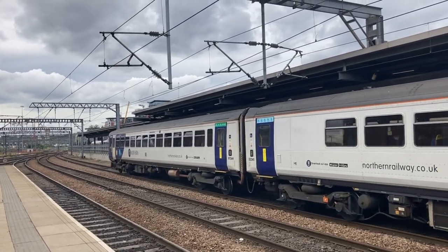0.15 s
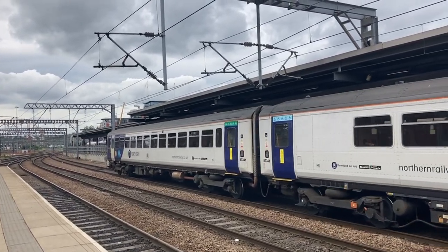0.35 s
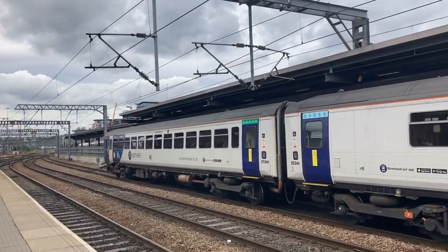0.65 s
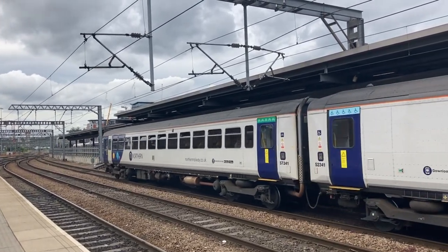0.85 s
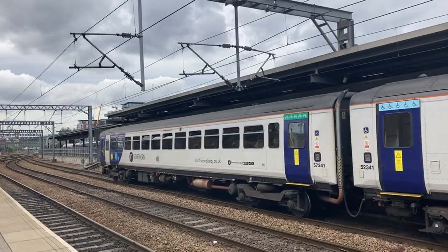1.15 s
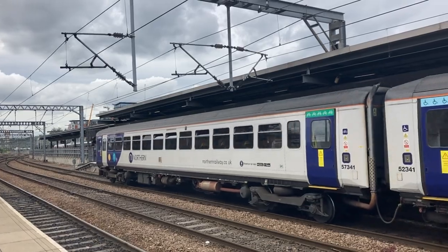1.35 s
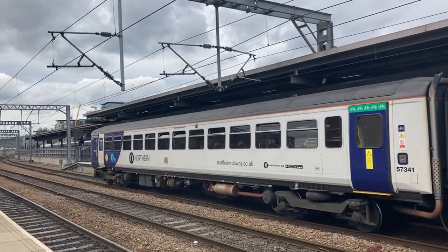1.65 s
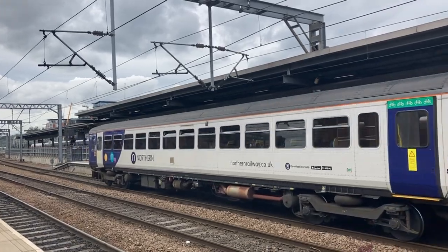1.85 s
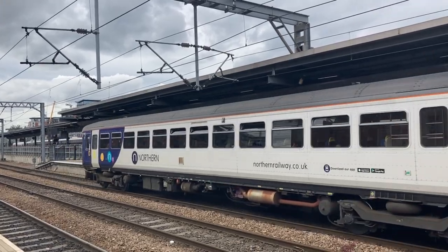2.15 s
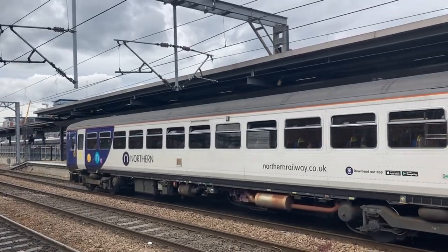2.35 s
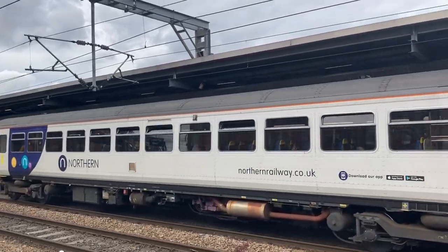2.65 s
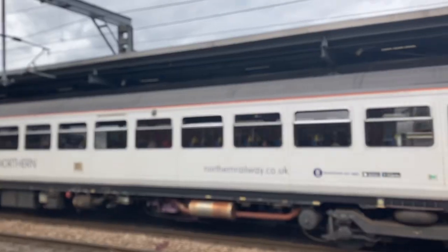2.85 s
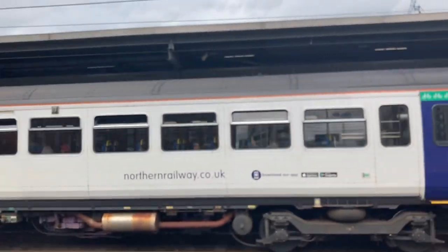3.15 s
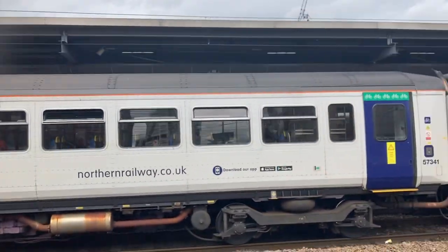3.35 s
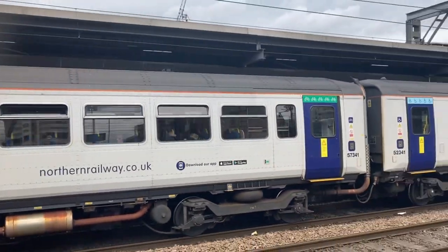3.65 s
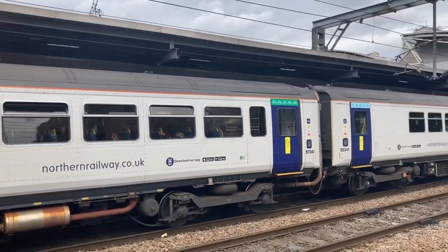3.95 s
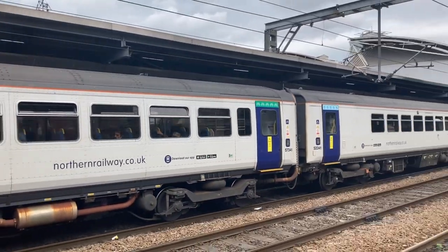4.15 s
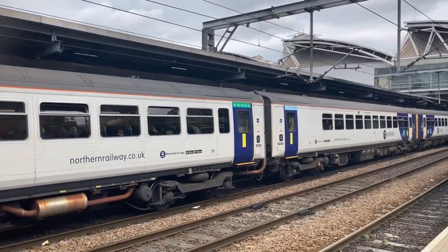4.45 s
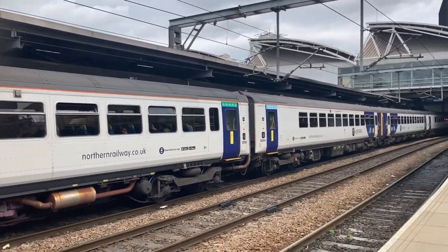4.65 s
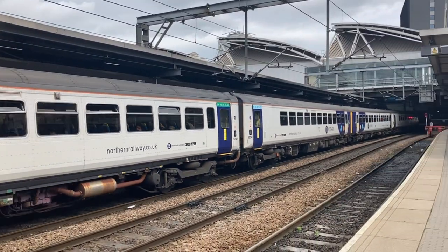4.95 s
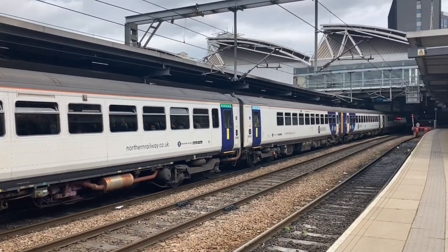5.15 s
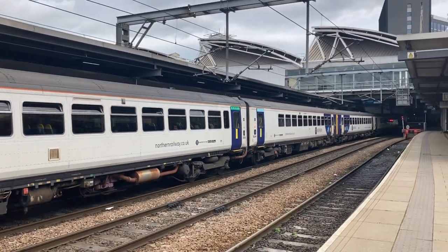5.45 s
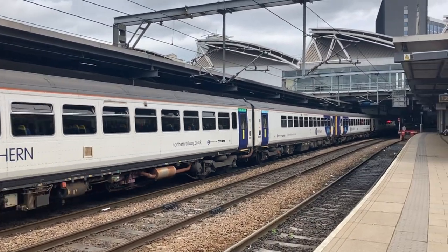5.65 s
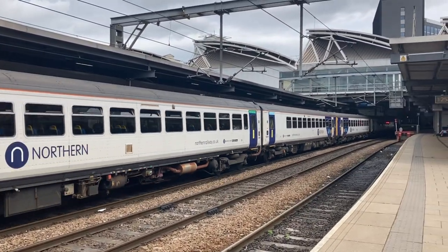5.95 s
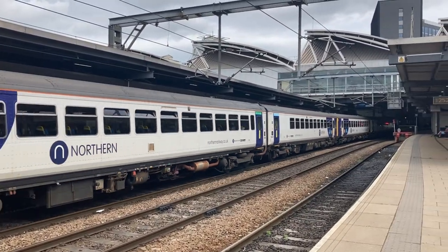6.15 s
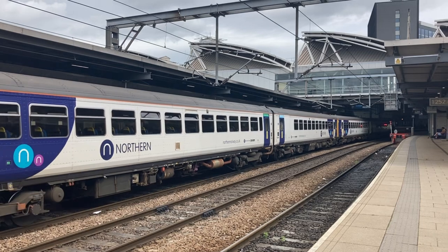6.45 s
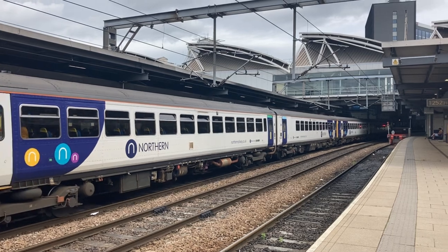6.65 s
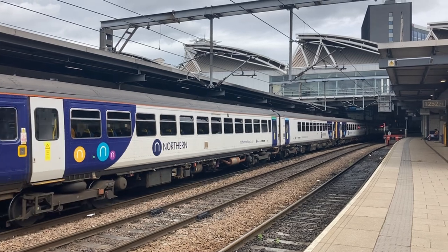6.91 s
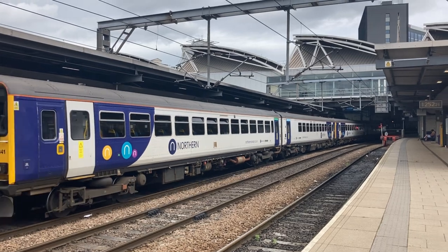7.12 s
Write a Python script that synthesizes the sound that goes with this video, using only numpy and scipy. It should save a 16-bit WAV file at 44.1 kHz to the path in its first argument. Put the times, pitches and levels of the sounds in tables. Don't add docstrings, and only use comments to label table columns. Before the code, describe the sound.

Close, windy phone pickup on a station platform: a low gust thump and an air-valve spit at once, then rolling wheel rumble with faint metal singing and diesel clatter. The valve chatters and releases a bright, hissing jet that dies away. Isolated spits return mid-way, strong fluttering gusts follow, and the last passing engine knocks harder towards the end, with slight canopy reflections.

```python
import sys
import numpy as np
from scipy import signal
from scipy.fft import rfft, irfft, next_fast_len
from scipy.io import wavfile
from scipy.ndimage import uniform_filter1d, minimum_filter1d, map_coordinates

SR = 44100
rng = np.random.default_rng(int(sys.argv[2]) if len(sys.argv) > 2 else 0)


def log_audio(samples):
    frames = np.atleast_2d(samples).T
    limited = np.clip(frames, -1, 1)
    pcm = np.round(limited * 32767).astype(np.int16)
    wavfile.write(sys.argv[1], SR, pcm)


def convert_level_to_amplitude(level_db):
    exponent = np.asarray(level_db, float) / 20
    return 10 ** exponent


N = 321048
TIME = np.arange(N) / SR
SIZE = next_fast_len(N + SR // 8)
HZ = np.fft.rfftfreq(SIZE, 1 / SR) + 1e-3

# [f/Hz, width/Hz, level/dB]
LAST_BLOCK = [(2420, 210, 6.5), (3010, 100, 4.5), (3900, 190, -4), (5500, 150, 0), (6000, 70, 7)]
HANDOVER_S = 3.73


def train():
    # [t/s, wheels/dB, engines/dB, rim ring/dB]
    passing = [(0, -33, -43.5, 0.5), (.35, -37, -48, 6.5), (.72, -35.5, -44, 5), (.77, -32, -43.5, 2),
               (1.3, -28.5, -40.5, 0.5), (1.8, -34.5, -42, 2), (2.3, -35, -42.5, -1.5),
               (2.6, -30, -42.5, -2.5), (2.85, -31, -43, -5), (3.1, -30.5, -39.5, -0.5),
               (3.93, -30, -39, 2.5), (4.2, -27.5, -40, 0.5), (4.6, -32.5, -43.5, 2),
               (5.09, -29.5, -40, -1), (5.6, -31.5, -41, 1), (6.02, -32.5, -40, -2),
               (6.6, -35.5, -43, -0.5), (7.28, -33.5, -42, -6)]
    # [t/s, lasts/s, level/dB]
    engine_dips = [
        (0.042, .1, -2),
        (0.633, .115, -6),
    ]
    roll_db, engine_db, rim_db = curves(passing)
    whole_db, bright_db = (db * np.exp(-((TIME - s) / lasts) ** 6) for s, lasts, db in engine_dips)
    pulses = firings()
    burning = np.convolve(pulses, np.exp(-np.arange(1200) / (.008 * SR)))[:N]
    wheels = convert_level_to_amplitude(roll_db + 2.5) * rolling(rim_db)
    gear_db = -40 + engine_db - engine_db.mean()
    engines = convert_level_to_amplitude(engine_db) * knock(burning, whole_db, bright_db) + convert_level_to_amplitude(gear_db) * gears()
    direct = wheels[0] + engines[0] + convert_level_to_amplitude(-40) * exhaust(pulses)
    direct += convert_level_to_amplitude(engine_db - 6.5 + .6 * bright_db) * engine_hiss(burning)
    return aimed(direct, convert_level_to_amplitude(-5) * wheels[1:] + convert_level_to_amplitude(.5) * engines[1:])


def rolling(rim_db):
    # [f/Hz, level/dB per Hz]
    roll_colour = [(18, -35), (30, 4.5), (85, 1.5), (176, 4), (357, 0), (426, -18.5), (617, -13.5),
                   (864, -0.5), (1120, -11), (1400, -7), (1820, -63), (3080, -120)]
    # [f/Hz, width/Hz, level/dB]
    rail_modes = [(732, 300, 5.5), (843, 105, -1), (1116, 104, 4.5)]
    # [t/s, level/dB]
    rail_ring = [(0, -2), (.5, 1.5), (1, -1.5), (1.5, -4), (2.1, 1), (2.7, -1), (3.25, 2), (4, 1.7),
                 (4.7, -2.5), (5.3, 0.5), (5.9, -1), (6.4, 5), (6.9, -1.5), (7.28, -4)]
    # [t/s, lasts/s, level/dB]
    shades = [
        (1.8, 0.34, 3),
        (2.4, .25, -2),
        (4.78, 0.31, -11),
        (7.0, .3, -5),
    ]
    rail_db = curves(rail_ring)[0]
    shade_db = sum(db * np.exp(-((TIME - s) / lasts) ** 2) for s, lasts, db in shades)

    def lift_db(lo):
        return rim_db * (lo > 900) + rail_db * (600 < lo < 900) + shade_db * (lo > 1100)

    gain = colour(roll_colour) * np.abs(1 + body(rail_modes))
    edges_hz = [0, 350, 500, 680, 950, 1190, 1750]
    return unit(restless(rng.standard_normal((3, N)), gain, edges_hz, 1.57, lift_db))


def firings():
    cylinder_db = [7.5, -20, 8, 1.5, -7, -0.5]
    firing_hz = 34.84
    count = int(N / SR * 34)
    late, strong = rng.standard_normal((2, count))
    at = ((np.arange(count) + 0.034 * late + .5) * SR / firing_hz).astype(int) % N
    pulses = np.zeros(N)
    pulses[at] = convert_level_to_amplitude(np.resize(cylinder_db, count) + 2.4 * strong)
    return pulses


def knock(burning, whole_db, bright_db):
    # [f/Hz, level/dB per Hz]
    knock_colour = [(1900, -13.5), (2250, -2), (3000, -2.5), (4300, -4.5), (5500, -14.5), (6400, -12.5),
                    (7000, -72)]
    # [f/Hz, width/Hz, level/dB]
    first_modes = [(2690, 350, 6), (3590, 89, -3), (2140, 60, -7)]
    handover_lasts_s = 1.4
    last = np.clip((TIME - HANDOVER_S) / handover_lasts_s + .5, 0, 1)
    burn = (burning + 2.45) * rng.standard_normal((3, N))
    first_block, last_block = shapes(burn, block_gain(first_modes), block_gain(LAST_BLOCK))
    blocks = (1 - last) * first_block + last * last_block

    def lift_db(lo):
        return whole_db + bright_db * (lo > 2800)

    edges_hz = 1800 * 2 ** np.arange(0, 2.1, 1 / 3)
    return unit(restless(blocks, colour(knock_colour), edges_hz, 1.55, lift_db))


def block_gain(modes):
    return 1 + sum(convert_level_to_amplitude(db) * np.abs(band(hz, width)) ** 2 for hz, width, db in modes)


def exhaust(pulses):
    # [f/Hz, width/Hz, level/dB]
    exhaust_modes = [(72.2, 8.3, 8.5), (106, 53, 0.5), (148, 69, -7)]
    return unit(shape(pulses, body(exhaust_modes) * band(107.4, 180)))


def gears():
    # [f/Hz, width/Hz, level/dB]
    gear_modes = [(1502, 80, 1), (1905, 500, -1)]
    sink_db = 3.5 * (2 * TIME / TIME[-1] - 1)
    lower, upper = shapes(rng.standard_normal((3, N)), body(gear_modes[:1]), body(gear_modes[1:]))
    return unit(convert_level_to_amplitude(1.23 * walk(7)) * (convert_level_to_amplitude(sink_db) * lower - convert_level_to_amplitude(-sink_db) * upper))


def engine_hiss(burning):
    # [f/Hz, level/dB per Hz]
    hiss_colour = [(5200, -26), (6300, 4.5), (8000, 3.5), (10000, 6.5), (12500, 3), (15500, -0.5),
                   (16500, -36)]
    return unit(shape((0.16 * burning + .5) * rng.standard_normal(N), colour(hiss_colour)))


def chirps():
    # [t/s, peak level/dB, strongest ring f/Hz]
    hard_knocks = [(4.6462, -39, 2430), (4.7186, -35, 2430), (4.9116, -34, 4100), (5.0887, -24, 3120),
                   (5.408, -36, 2420), (5.5402, -26, 2450), (5.8505, -31, 2330), (6.0216, -26, 2970),
                   (6.054, -29, 2470), (6.1019, -33, 2450), (6.1388, -30, 2460), (6.2256, -29, 3030),
                   (6.274, -37, 2460), (6.3159, -35, 2480), (6.3578, -29.5, 2530), (6.3883, -30, 3000),
                   (6.4865, -29, 2320), (6.527, -29, 2450), (6.6547, -29.5, 2490), (6.6966, -29, 2430),
                   (6.727, -31, 2470), (6.7589, -27.5, 3100), (6.7904, -29, 2420), (6.8687, -30, 2430),
                   (6.9295, -26, 3070), (7.0348, -29, 2970), (7.1181, -31.5, 2510), (7.161, -27.5, 2850),
                   (7.2039, -25.5, 3010), (7.2378, -29, 2420)]
    rise_s, width_hz, fan_hz = .004, 360, 5900
    out = convert_level_to_amplitude(-66) * np.clip((TIME - HANDOVER_S) / 2, 0, 1) * np.sin(2 * np.pi * fan_hz * TIME)
    noise = rng.standard_normal(N)
    block = convert_level_to_amplitude(-8) * unit(shape(noise, body(LAST_BLOCK)))
    t = np.arange(int(.05 * SR)) / SR
    for s, db, hz in hard_knocks:
        at = slice(int(s * SR), int(s * SR) + len(t))
        edges = [hz - width_hz / 2, hz + width_hz / 2]
        ring = unit(signal.sosfilt(signal.butter(1, edges, "band", fs=SR, output="sos"), noise[at]))
        push = (t / rise_s * np.exp(1 - t / rise_s))[:len(ring)]
        out[at] += convert_level_to_amplitude(db - 9) * push * (ring + block[at])
    return out


def singing():
    # [t/s, lasts/s, level/dB, f/Hz]
    sung = [(.03, .06, -47, 2130), (.34, 0.046, -33.5, 890), (.38, .05, -35, 1130), (.47, .06, -30.5, 1185),
            (.5, 0.13, -36, 890), (.66, .05, -40, 1200), (0.803, .05, -30, 950), (.85, .06, -32, 730),
            (.89, 0.042, -30.5, 860), (.88, .05, -37, 1313), (1.224, .08, -34, 1965),
            (1.321, .08, -36, 904), (1.82, 0.085, -36, 840), (1.93, 0.097, -48, 2950),
            (2.534, .07, -41, 1873), (2.62, 0.05, -38, 1507), (2.68, 0.06, -33, 860),
            (2.72, 0.063, -30.5, 715), (2.91, .08, -45, 2520), (3.01, 0.089, -40, 2000),
            (3.159, 0.055, -29, 2690), (3.319, 0.05, -41, 880), (3.423, .08, -36, 700),
            (3.776, .08, -37, 1290), (3.852, 0.1, -33, 690), (4.75, 0.092, -42, 1787),
            (5.282, .08, -35, 1100), (5.54, 0.085, -32, 845), (6.3, .08, -38, 1120),
            (6.376, 0.092, -39, 640), (6.725, 0.087, -40, 1076), (7.082, 0.07, -39.5, 710)]
    out, waver, flicker = np.zeros(N), walk(14), walk(40)
    for s, lasts, db, hz in sung:
        near = slice(max(int((s - .3) * SR), 0), int((s + .3) * SR))
        own = int(hz) * 50
        turns = np.cumsum(hz * (1 + .012 * np.roll(waver, own)[near])) / SR
        swell = np.exp(-((TIME[near] - s) / lasts) ** 2)
        level = convert_level_to_amplitude(db + 2.5 * np.roll(flicker, own)[near])
        out[near] += level * swell * np.sin(2 * np.pi * turns)
    return out


def valve():
    air = blow_off() + spits()
    return aimed(air[0], convert_level_to_amplitude(1) * air[1:])


def blow_off():
    # [t/s, jet level/dB, whistle level/dB]
    blow = [
        (1.17, -30, -36),
        (1.2, -24, -28),
        (1.28, -28.5, -30),
        (1.33, -25, -29.5),
        (1.63, -22.5, -29.5),
        (1.7, -30.5, -31),
        (1.89, -26, -32.5),
        (2.04, -35.5, -32),
        (2.2, -55, -50.5),
        (2.42, -47, -54),
    ]
    # [f/Hz, level/dB]
    jet_colour = [(1500, -15), (4000, -12), (6000, -10), (7500, -3.5), (10000, 7.5), (12500, 5.5),
                  (15500, 5), (16500, -31)]
    # [multiple of pipe pitch, width/Hz, level/dB]
    pipe_tones = [(2, 17, 0), (3.9, 120, -18), (4.95, 130, -12), (6.15, 170, -22), (6.72, 65, -6.5),
                  (7, 110, 2.5), (8, 68, -1.5), (9, 40, 0), (10, 170, -9), (11, 43, -1), (11.6, 90, -9),
                  (12, 50, -2), (13, 21, 5), (15, 12, 10)]
    # t/s, lasts/s, level/dB
    widest = (1.39, 0.26, -36)
    surge_s, surge_lasts_s, surge_db = widest
    pipe_hz, whistle_dies_s = 1015.1, 2.27
    noise = rng.standard_normal((3, N))
    pipe = colour(jet_colour) / (1 - .13 * np.exp(-2j * np.pi * HZ / pipe_hz))
    jet, surge = map(unit, shapes(noise, pipe, band(6920, 2500) * band(7000, 3000)))
    jet_db, whistle_db = curves(blow)
    on = np.interp(TIME, [1.17, 1.195, 2.3, 2.45], [0., 1., 1., 0.])
    spurts, waver = walk(69.73), walk(24.86)
    families = [[(k * pipe_hz, width, db) for k, width, db in pipe_tones[first::4]] for first in range(4)]
    tones = shapes(noise, *map(body, families))
    slow = uniform_filter1d(waver, size=2500)
    whistle = unit(sum(convert_level_to_amplitude(np.roll(slow, 9000 * k)) * tone for k, tone in enumerate(tones)))
    whistle = whistle / (1 + (TIME / whistle_dies_s) ** 40)
    air = convert_level_to_amplitude(jet_db + waver) * jet + convert_level_to_amplitude(whistle_db - 0.5 - 0.81 * waver) * whistle
    air = on * convert_level_to_amplitude(1.1 + spurts) * air
    wide_open = np.exp(-((TIME - surge_s) / surge_lasts_s) ** 2)
    return air + on * convert_level_to_amplitude(surge_db + spurts) * wide_open * surge


def spits():
    # [t/s, peak level/dB, crack level/dB, opening/ms]
    lone_spits = [(.08, -14, 13.5, 2.6), (.0934, -27, 16, 2.7), (.2777, -28, 0, 4), (0.552, -23, 15, 2.6),
                  (.829, -22, 3, 5), (0.9584, -18.5, 8, 6), (2.81, -20.5, -4, 6.9),
                  (3.719, -12.5, -2.5, 12.4), (3.926, -14, 0, 9.1), (3.972, -29, 11, 9.6),
                  (4.091, -16.5, 0, 10.5), (4.226, -19.5, 3, 2.8), (4.8882, -21.5, -10, 7.4)]
    # [t/s, peak level/dB]
    stutters = [(0.865, -19), (.972, -17), (.9914, -14.5), (1.0848, -15.5), (1.099, -17), (1.1143, -8.5),
                (1.129, -15.5), (1.153, -16.5), (1.1694, -27.5), (1.1906, -24)]
    # peak level/dB, t60/s, dull hiss level/dB, crack level/dB, opening/ms
    closing = (-30, 0.07, -2.5, 13, 3)
    bands = [band(12130, 3140) * band(12900, 4300), band(9750, 2300) * band(11740, 3100),
             band(8400, 3700) * band(7500, 5000)]
    shrill, wide, dull = map(unit, shapes(rng.standard_normal((3, N)), *bands))
    chatter = convert_level_to_amplitude(2.2 * walk(500))
    t = np.arange(int(.4 * SR)) / SR
    # t/s, peak/dB, t60/s, dull hiss/dB, crack/dB, opening/ms
    events = [(s, db, .39, -23, crack_db, open_ms) for s, db, crack_db, open_ms in lone_spits]
    events += [(s, db, .3, -16, 1, 3.9) for s, db in stutters]
    events += [(2.2385, *closing)]
    air = np.zeros((3, N))
    for s, db, t60, dull_db, crack_db, open_ms in events:
        at = slice(int(s * SR), int(s * SR) + len(t))
        opening = t / (open_ms / 1000)
        crack = chatter[at] * np.exp(-(2 * opening - 1) ** 4)
        escape = (0.68 * convert_level_to_amplitude(-60 * t / 0.065) + 0.47 * convert_level_to_amplitude(-60 * t / t60)) * np.minimum(opening, 1)
        lower = 0.59 * wide[:, at] + convert_level_to_amplitude(dull_db + 7) * dull[:, at]
        hiss = 0.62 * shrill[:, at] + np.minimum(0.7 * opening, 1) * lower
        air[:, at] += convert_level_to_amplitude(db - 12) * (convert_level_to_amplitude(crack_db) * crack + escape) * hiss
    return air


def wind():
    low, quick = gusts()
    lumps = convert_level_to_amplitude(2.5 * np.array([walk(45), walk(45), walk(45)])) * rng.standard_normal((3, N))
    deep, light, brisk = shapes(lumps, band(73, 113) * band(42, 90), band(252, 158) * band(374, 730),
                                band(322, 230) * band(380, 500))
    facing = np.exp(-((TIME - 4.85) / .98) ** 4)
    light = (1 - facing) * unit(light) + facing * unit(brisk)
    buffet, flutter = np.sqrt(low) * unit(deep), np.sqrt(quick) * unit(light)
    out = buffet[0] + convert_level_to_amplitude(-2) * buffet[1:] + flutter[0] + convert_level_to_amplitude(-3.5) * flutter[1:]
    return out + eddies()


def gusts():
    # [t/s, level/dB]
    breeze_levels = [(0, -32.5), (.55, -30.5), (.87, -31), (1.0, -27), (1.4, -32), (1.9, -32.5), (2.4, -32),
                     (2.8, -33), (3.4, -34), (4.4, -32.5), (4.7, -34), (5.35, -34), (5.87, -35.5),
                     (6.05, -34.5), (6.28, -47), (6.55, -32), (6.9, -33.5), (7.28, -31)]
    # [t/s, hold/s, buffet level/dB, flutter above buffet/dB]
    gust_table = [(0.0, 0.037, -19, -8), (0.99, .015, -32.5, 4.5), (1.04, 0.06, -24, -15),
                  (1.18, 0.051, -19.5, -13), (1.252, 0.15, -23.5, -8.5), (1.458, 0.22, -27.5, -9.5),
                  (2.096, 0.052, -31.5, 4), (2.161, 0.18, -25.5, -4.5), (2.514, 0.02, -27, -8),
                  (2.63, 0.037, -22.5, -6), (2.72, 0.088, -25, -12), (3.04, 0.15, -21.5, -13),
                  (3.595, 0.16, -28, -10), (4.007, 0.1, -29.5, 2), (4.18, 0.1, -25.5, 7),
                  (4.275, 0.057, -33.5, 6.5), (5.054, 0.11, -37.5, 11), (5.213, .04, -31, 2),
                  (5.37, .015, -27.5, -0.5), (5.462, 0.016, -26, -3), (5.543, 0.034, -28, 3),
                  (5.643, 0.087, -24.5, 2.5), (5.92, 0.033, -34, 2.5), (6.115, 0.017, -19.5, -10),
                  (6.16, 0.043, -29, 4.5), (6.373, 0.013, -34, 9), (6.536, 0.022, -36, -7),
                  (6.72, 0.074, -35.5, 0.5), (6.982, 0.07, -33, 0), (7.118, .05, -26.5, -12)]
    rise_s, fall_s = .0088, .021
    low = convert_level_to_amplitude(curves(breeze_levels)[0]) ** 2
    quick = low * convert_level_to_amplitude(-1) ** 2
    for s, hold, db, flutter_db in gust_table:
        near = slice(max(int((s - .05) * SR), 0), int((s + hold + .3) * SR))
        t = TIME[near] - s
        swell = np.clip(t / rise_s + 1, 0, 1) * np.exp(-np.clip(t - hold, 0, 1) / fall_s)
        gust = (convert_level_to_amplitude(db) * swell) ** 2
        low[near] += gust
        quick[near] += gust * convert_level_to_amplitude(flutter_db) ** 2
    return low, quick


def eddies():
    # [t/s, peak level/dB, f/Hz,
    # length/cycles]
    eddy_table = [(0.052, -5, 92, 1.7), (1.101, -9, 104, 2.3), (1.363, -7, 155.5, 1.6),
                  (1.6105, -6.5, 132, 0.56), (1.689, -9.5, 106, 0.49), (2.249, -4.5, 111, 0.79),
                  (2.285, -9, 95, 0.65), (2.565, -12.5, 66, 1.9), (2.628, -10, 141, 1.1),
                  (2.6688, -7.5, 113, 0.73), (2.953, -4.5, 94.5, 0.55), (3.067, -7, 114.4, 1.3),
                  (3.1204, -1, 91, 0.2), (3.1843, -9, 137, 0.75), (3.727, -18.5, 97, 0.82),
                  (4.095, -10, 146, 1.1), (4.221, -10, 93, 1.5), (4.266, -10.5, 153, 2.3),
                  (5.0198, -9, 128, 0.52), (5.9292, -8, 109, 0.5), (6.0867, -13, 100, 0.79),
                  (6.5856, -18, 67.3, 2.4), (6.976, -13, 83, 1.3), (7.147, -13.5, 145, 2.1),
                  (1.2013, -13.5, 290, 1.4), (1.367, -10.5, 293, 3.6), (2.1, -10.5, 314, 1),
             (2.1565, -13, 297, 4.1), (2.2598, -17, 320, 1.18), (2.666, -13, 477, 0.52),
             (3.0455, -14, 248, 3.6), (3.178, -11, 290, 2.5), (4.0268, -3, 465, 0.69),
             (4.085, -10, 431, 0.97), (4.1841, -6, 384, 0.77), (4.2006, -4, 421, 1.4),
             (4.217, -1, 432, 1.4), (4.2361, -5, 500, 1.7), (4.2515, -21.5, 402, 2.1),
             (4.2729, -5, 452, 0.46), (4.2976, -5, 547, 1.96), (4.3271, -10.5, 407, 2.3),
             (5.132, -7, 309, 0.6), (5.172, -6, 364, 0.62), (5.3732, -5.5, 324, 0.48),
             (5.4616, -12, 620, 1.8), (5.6304, -6.5, 477, .87), (5.701, -5, 496, 0.82),
             (5.7221, -10, 494, 1.1), (5.8005, -5.5, 460, 0.57), (5.9228, -11, 415, 2.6),
             (6.1258, -9.5, 246, 2.57), (6.172, -2, 424, 0.8), (7.14, -8.5, 296, 1.9),
                  (0.3227, -16, 855, 2.5), (.46, -25, 50, 1.5), (.53, -18, 300, 2.7), (0.821, -15, 200, 1.2),
              (1.0, -14, 280, 2.8), (1.06, -15.5, 130, 1.9), (1.14, -13, 320, 3), (1.29, -11, 48, 1.5),
              (1.3, -10, 216, 2.1), (1.42, -22, 48, 1.5), (2.701, -14, 340, 3.3), (2.762, -13, 120, 0.89),
              (2.79, -17, 236, 2.5), (2.87, -18.5, 50, 1.5), (3.113, -12, 280, 2),
              (3.2925, -13.5, 846, 2.5), (3.98, -18, 343, 3), (4.141, -14, 86, 1.8), (4.32, -16, 150, 2),
              (5.39, -19, 64, 1.5), (5.63, -14, 366, 3), (5.8, -16, 300, 3), (7.13, -14, 48, 1.6),
              (7.24, -16, 47.4, 1.55)]
    out = np.zeros((2, N))
    for s, db, hz, cycles in eddy_table:
        near = slice(max(int((s - .08) * SR), 0), int((s + .08) * SR))
        u = (TIME[near] - s) * hz
        pan_db = 4 * max(np.log2(hz / 290), 0)
        wave = np.cos(2 * np.pi * (u - 0.058 * u ** 2 + rng.random()))
        eddy = wave * np.exp(-4 * np.log(2) * (u / cycles) ** 2)
        out[:, near] += convert_level_to_amplitude(db - 5.5 + np.array([[pan_db], [-pan_db]]) / 2) * eddy
    return out


def aimed(direct, diffuse):
    # [t/s, left lags right/ms, left minus right/dB]
    phone_turn = [(0, 0.11, -1.5), (.7, 0.21, 0.5), (1.3, 0.34, -0.5), (2, 0.35, 1), (2.4, 0.071, 1.5),
                  (3, -0.093, 1.5), (3.5, -0.24, 1.5), (4.7, -0.21, 1.5), (5.5, -0.15, 2.5),
                  (6.4, -0.038, 1.5), (7.28, -0.032, 2.5)]
    lag_ms, pan_db = curves(phone_turn)
    left = map_coordinates(direct, [np.arange(N) - lag_ms * SR / 1000], order=3, mode="nearest")
    return (np.array([left, direct]) + diffuse) * convert_level_to_amplitude(np.array([pan_db, -pan_db]) / 2)


def one_port_treble(dry):
    high = 1 / (1 + (6300 / HZ) ** 24)
    turn = np.exp(-2j * np.pi * (HZ - 7080) * .231 / 1000)
    mid = shape(dry[1], high * (turn + 1) / 2)
    side = shape(.8 * dry[1] + .45 * dry[0], high * (turn - 1) / 2)
    return shape(dry, 1 - high) + np.array([mid + side, mid - side])


def starve(x, margin_db, calm_db):
    # [low f/Hz, high f/Hz]
    deaf_bands = [(8380, 9560), (13250, 14050)]
    hz, _, cells = signal.stft(x, SR, nperseg=1536)
    middle = cells.mean(axis=0)
    power = np.abs(middle) ** 2
    treble = power[hz > 7000].mean(axis=0)
    loud = treble > 40 * np.median(treble)
    power = uniform_filter1d(power, size=2, axis=1)
    margin = convert_level_to_amplitude(2 * np.where(loud, margin_db, calm_db))
    weak = uniform_filter1d(power, size=4, axis=0) < uniform_filter1d(power, size=18, axis=0) * margin
    weak &= ((hz > 2700) & (hz < 6600))[:, None]
    steady = uniform_filter1d(1. * loud, size=9) > .95
    steady |= treble < 5 * uniform_filter1d(minimum_filter1d(treble, size=15), size=15)
    deaf = steady & sum((hz > lo) & (hz < hi) for lo, hi in deaf_bands)[:, None].astype(bool)
    return signal.istft(cells - middle * (weak | deaf), SR, nperseg=1536)[1][:, :N]


def shape(x, gain):
    return irfft(rfft(x, SIZE) * gain, SIZE)[..., :N]


def shapes(x, *gains):
    spectrum = rfft(x, SIZE)
    return [irfft(spectrum * gain, SIZE)[..., :N] for gain in gains]


def band(hz, width):
    return 1 / (1 + 1j * (HZ / hz - hz / HZ) * hz / width)


def body(modes):
    return sum((-1) ** k * convert_level_to_amplitude(db) * band(hz, width) for k, (hz, width, db) in enumerate(modes))


def colour(points):
    hz, db = np.transpose(points)
    return convert_level_to_amplitude(np.interp(np.log(HZ), np.log(hz), db))


def unit(x):
    return x / np.sqrt(np.mean(x ** 2))


def curves(table):
    s, *columns = np.transpose(table)
    return [np.interp(TIME, s, c) for c in columns]


def walk(rate):
    k = int(SR / rate)
    held = np.repeat(rng.standard_normal(N // k + 1), k)
    return 1.739 * uniform_filter1d(uniform_filter1d(held, k), k)[:N]


def restless(source, gain, edges_hz, flicker_db, lift_db):
    spectrum = rfft(source, SIZE) * gain
    out = 0
    for lo, hi in zip(edges_hz, edges_hz[1:]):
        level_db = .3 * walk(1.18) + flicker_db * walk(9) + lift_db(lo)
        out = out + convert_level_to_amplitude(level_db) * irfft(spectrum * (HZ >= lo) * (HZ < hi), SIZE)[:, :N]
    return out


def scene():
    return train() + aimed(singing() + chirps(), 0) + valve() + wind()


def roll_off(x):
    return signal.sosfilt(signal.butter(12, 16990, fs=SR, output="sos"), x)


def record(dry):
    both = one_port_treble(dry)
    limits = 1 / (1 + (HZ / 15790) ** 300) / (1 + (35 / HZ) ** 4)
    limited = shape(np.tanh(1.1 * both) / 1.1, limits)
    return roll_off(starve(limited, margin_db=-.6, calm_db=-3.5))


dry = scene()
out = record(dry)
log_audio(out)
```